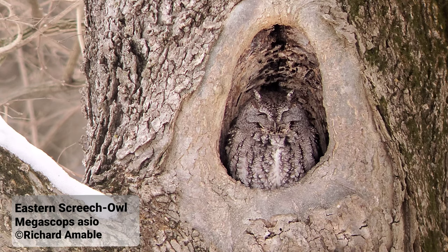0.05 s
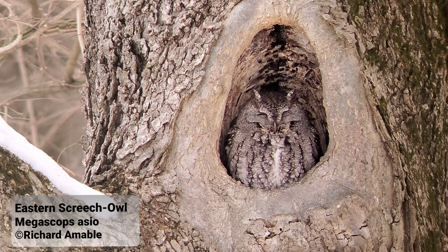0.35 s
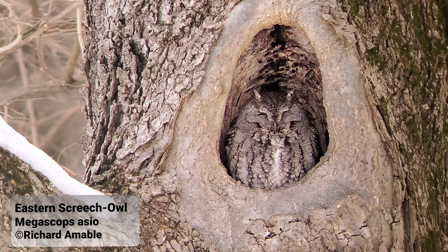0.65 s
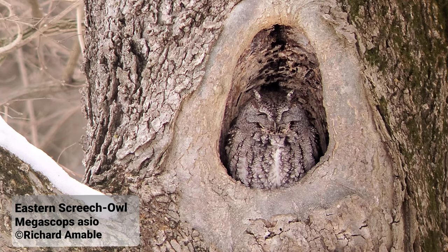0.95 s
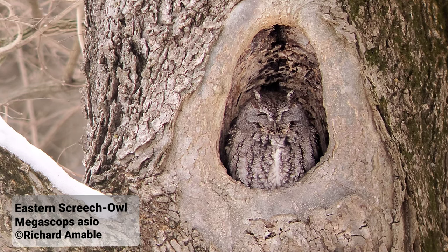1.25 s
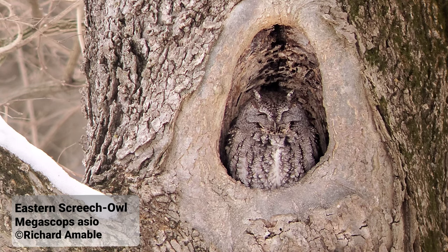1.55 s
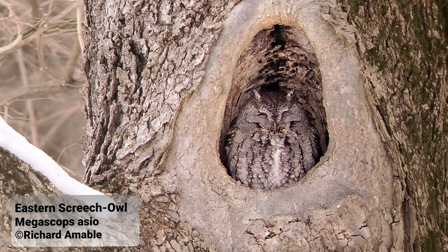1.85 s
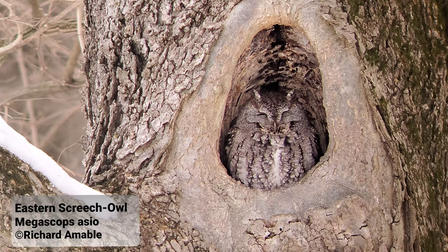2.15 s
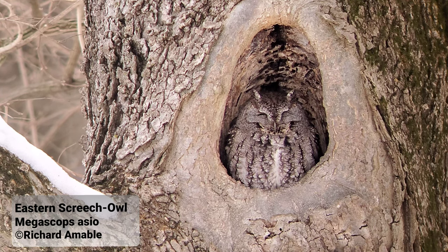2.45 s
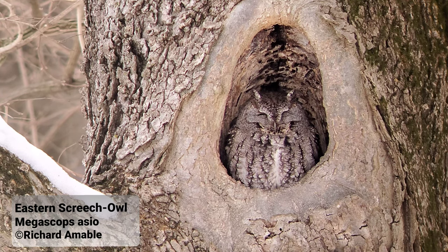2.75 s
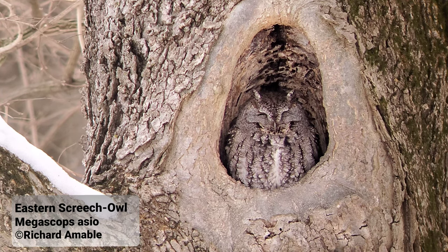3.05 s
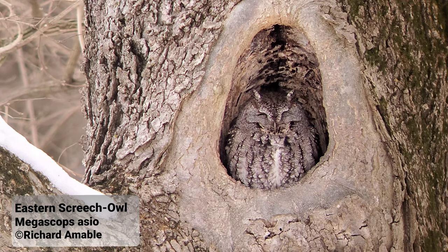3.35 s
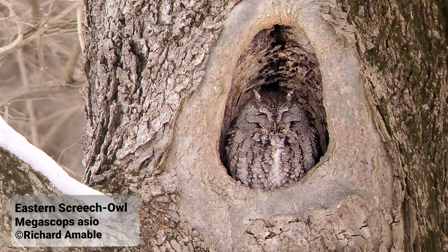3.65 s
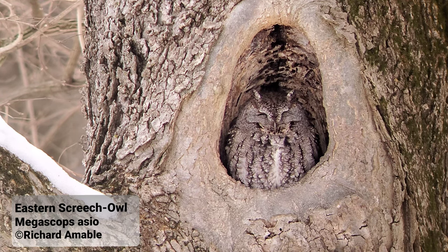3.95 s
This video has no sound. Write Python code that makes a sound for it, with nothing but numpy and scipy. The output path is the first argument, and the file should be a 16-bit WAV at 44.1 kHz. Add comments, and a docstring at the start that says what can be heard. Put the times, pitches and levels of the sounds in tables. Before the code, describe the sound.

A steady low rumble of far traffic hangs among the trees, under faint hiss. Faraway birds whistle and a small bird chips softly, then light gusts thump dully on the microphone with a faint leaf rustle.

```python
"""First comes the low rumble and tyre wash of far traffic in a winter wood, with the echo of a distant
call dying away over faint microphone hiss. Far birds whistle, their notes scattered by the trunks.
A small bird gives two soft chips and, between them, one thin rising chirp; a faint high tick follows
the first chip. Near the end a breeze buffets the microphone, mostly its right port (sound opening),
and dry leaves rustle faintly."""
import sys
import numpy as np
from scipy import signal
from scipy.fft import rfft, irfft
from scipy.io import wavfile
from scipy.ndimage import uniform_filter1d, map_coordinates

SR = 44100
rng = np.random.default_rng(int(sys.argv[2]) if len(sys.argv) > 2 else 0)


def master_out(mix):
    """Clip the mix to full scale and print it as 16-bit PCM to the path in sys.argv[1]."""
    frames = np.transpose(np.atleast_2d(mix))
    ceiling = np.clip(frames, -1, 1)
    pcm = np.round(ceiling * 32767).astype(np.int16)
    wavfile.write(sys.argv[1], SR, pcm)


N = 176400  # 4 seconds
T = np.arange(N) / SR


def amp(db):
    """Turn decibels into a number to multiply a sound by."""
    return 10 ** (np.asarray(db) / 20)


def unit(x):
    """Scale a sound to an average power of 1."""
    return x / np.sqrt(np.mean(x ** 2) + 1e-20)


def along(points, hz):
    """Read between (frequency, value) points, spaced by musical pitch."""
    f, v = np.transpose(points)
    return np.interp(np.log(hz + 1), np.log(f + 1), v)


def curve(rows):
    """Join (time, value) points with straight lines."""
    return np.interp(T, *np.transpose(rows))


def wobble(rate):
    """A smooth random curve through `rate` new values a second."""
    return map_coordinates(rng.standard_normal(4096), [T * rate + 2], mode="mirror")


def pan(db):
    """Left and right gains that make the left side `db` decibels louder."""
    return unit(amp(np.array([[db], [-db]]) / 2))


def rush(spectrum, alike=((1, 0),)):
    """Stereo noise with the given tone colour; the sides match where `alike` is 1, unrelated at 0."""
    hz = np.fft.rfftfreq(N, 1 / SR)
    fade_above = 1 / (1 + (hz / spectrum[-1][0] / 1.2) ** 12)
    fade_below = 1 / (1 + (spectrum[0][0] / 1.2 / (hz + 1)) ** 6)
    colour = fade_above * fade_below * amp(along(spectrum, hz))
    spread = np.arccos(np.clip(along(alike, hz), -1, 1)) / 2
    white = rfft(rng.standard_normal((2, N)))
    mid, side = irfft(white * colour * [np.cos(spread), np.sin(spread)], N)
    return unit(np.array([mid + side, mid - side]))


def steadied(x, span_s):
    """Even out the swells in a noise that are slower than span_s."""
    power = np.mean(np.abs(signal.hilbert(np.atleast_2d(x))) ** 2, axis=0)
    slow_power = uniform_filter1d(power, max(1, int(span_s * SR)))
    return unit(x / np.sqrt(np.abs(slow_power) + 1e-9))


def burst(start, attack, hold, t60):
    """Rise quickly, hold, then fade by 60 dB every t60 seconds."""
    return np.clip((T - start) / attack, 0, 1) * amp(-60 * np.maximum(T - start - hold, 0) / t60)


def woods(x, t60=0.34):
    """Tree trunks scatter a sound into a short, wide echo."""
    t = T[:SR // 2]
    tail = rng.standard_normal((2, len(t))) * amp(-60 * t / t60) * (1 - np.exp(-t / 0.0035))
    return signal.fftconvolve(x[None], tail / np.linalg.norm(tail[0]), axes=1)[:, :N]


# Tone colour of engines and tyres: (frequency [Hz], relative level [dB])
ENGINE_COLOUR = [(12, -56.5), (20, -33), (32, -13.5), (45, -7), (64, 1), (77, -1.5), (100, -6), (135, -12),
                 (180, -18), (260, -18), (400, -25.5), (520, -59)]
TYRE_COLOUR = [(150, -28), (280, -0.5), (360, -2), (470, -3.5), (600, -6.5), (820, -7), (1000, -14.5),
               (1250, -25), (1700, -33), (3000, -40.5)]
# How each swells and sinks: (time [s], relative level [dB])
ENGINE_SWELLS = [(0, -55.5), (.2, -53.5), (.42, -56), (.7, -55), (1.1, -53.5), (1.35, -53), (1.75, -54.5),
                 (2.1, -53), (2.35, -57), (2.48, -52), (2.62, -57), (2.86, -54), (3.1, -52.5), (4, -51.5)]
TYRE_SWELLS = [(0, -67), (.2, -66.5), (.55, -67), (.85, -67.5), (1.4, -70), (1.8, -66.5), (2.2, -68.5),
               (2.6, -70), (3.3, -67.5), (3.85, -65.5), (4, -68)]
# How alike left and right sound: (frequency [Hz], likeness [-1 to 1])
SIDES_ALIKE = [(60, 0.98), (150, 0.96), (370, 0.71), (910, 0.15), (2250, -0.25), (5580, -0.0),
               (13800, -0.0)]

def traffic():
    """Far engines rumble near the middle while the wash of tyres spreads wider."""
    rumble = steadied(rush(ENGINE_COLOUR, SIDES_ALIKE), span_s=.25) * amp(curve(ENGINE_SWELLS) + 2)
    tyres = rush(TYRE_COLOUR, SIDES_ALIKE) * amp(curve(TYRE_SWELLS) + 2.5 + 0.74 * wobble(7))
    return rumble + tyres


# Tone colour of the call's echo: (frequency [Hz], relative level [dB])
ECHO_COLOUR = [(800, -20), (1150, -5), (1370, -0.5), (1550, 1), (1700, -9), (1900, -14), (2300, -26)]

def far_call(t60=1.11):
    """The last echo of a distant call, perhaps a crow's, dies away."""
    return rush(ECHO_COLOUR) * amp(-69.5 - 60 * T / t60) * pan(db=2)


# Tone colour of the hiss and the sizzle: (frequency [Hz], relative level [dB])
HISS_COLOUR = [(500, 3.5), (1500, -2), (2600, -2), (4000, -3.5), (5400, -3), (6100, -11), (7200, -11),
               (9000, -7.5), (12000, -3), (14500, -3)]
SIZZLE_COLOUR = [(3700, -26.5), (4450, 5), (5100, 2.5), (5900, -36)]

def hiss():
    """The microphone hisses steadily, with a flickering sizzle on the left."""
    steady = rush(HISS_COLOUR) * amp(-81.5) * pan(db=1.5)
    sizzle = rush(SIZZLE_COLOUR) * amp(-92 + 1.8 * wobble(9.5)) * pan(db=22.5)
    return steady + sizzle


# Whistles of far birds: (start [s], length [s], pitch [Hz], level [dB])
FAR_WHISTLES = [(.645, .07, 4850, -81), (0.754, .11, 4850, -84), (0.894, 0.062, 5200, -87),
                (2.14, .08, 2520, -87), (2.488, .16, 2560, -88.5), (2.88, 0.098, 2580, -87)]

def far_birds():
    """Wavering notes from so far off that only their scattered echo arrives."""
    notes = np.zeros(N)
    for start, length, hz, db in FAR_WHISTLES:
        swell = np.sin(np.pi * np.clip((T - start) / length, 0, 1))
        pitch = hz * (1 + .03 * wobble(300))
        notes += amp(db) * swell * np.sin(2 * np.pi * np.cumsum(pitch) / SR)
    return woods(notes) * pan(db=6)


# The small bird's two chips: (start [s], relative level [dB])
CHIP_CALLS = [(0.763, -77.5), (2.378, -85)]
# Tone colour of their rasp: (frequency [Hz], relative level [dB])
RASP_COLOUR = [(2000, -24), (2700, -7), (3200, -12), (3650, -5.5), (4150, -4), (5100, -5), (5900, -15),
               (8000, -34)]

def chips():
    """Each chip is a short, rough note and a noisy rasp, blurred by the trees."""
    rasp_level = sum(amp(db) * burst(s, attack=.0033, hold=.038, t60=.44) for s, db in CHIP_CALLS)
    rasp = rasp_level * rush(RASP_COLOUR) * amp(1.3 * wobble(90))
    note_level = sum(amp(db) * burst(s, attack=.0033, hold=.034, t60=.03) for s, db in CHIP_CALLS)
    pitch_hz = 3660 + 107 * wobble(250)
    note = note_level * np.sin(2 * np.pi * np.cumsum(pitch_hz) / SR)
    return (rasp + amp(-1.5) * (note + .6 * woods(note))) * pan(db=7.5)


# Tone colour of the tick: (frequency [Hz], relative level [dB])
HIGH_TICK_COLOUR = [(4000, -25), (5300, 5), (7000, -17), (9000, 1), (12000, -5), (15000, -10)]

def tick():
    """One faint, high, blurred tick."""
    return rush(HIGH_TICK_COLOUR) * amp(-82.5) * burst(start=.905, attack=.008, hold=.036, t60=.31)


def chirp(start_s=1.301, length_s=.024, low_hz=5500, high_hz=8150, rise_s=.0085):
    """The small bird's thin whistle sweeps up, growing louder as its pitch levels off."""
    age = np.clip(T - start_s, 0, length_s)
    progress = age / length_s
    pitch_hz = high_hz + (low_hz - high_hz) * np.exp(-age / rise_s) + 90 * wobble(600)
    swell = amp(-80.5 + 6.4 * progress) * np.abs(np.sin(np.pi * progress)) ** 0.23
    note = swell * np.sin(2 * np.pi * np.cumsum(pitch_hz) / SR)
    return (note + amp(9) * woods(note)) * pan(db=3)


# The breeze, very faint until near the end: (time [s], level [dB])
BREEZE_LEVEL = [(0, -74), (2.85, -74.5), (3.1, -56.5), (3.3, -49), (3.5, -55), (3.65, -66.5), (3.85, -44),
                (4, -58.5)]
# Tone colour of air hitting the microphone: (frequency [Hz], relative level [dB])
WIND_COLOUR = [(20, -24.5), (35, -8), (55, 1), (72, 0), (100, -11.5), (150, -17.5), (210, -34.5),
               (400, -44), (800, -48), (2000, -73)]
# Swirls of air striking the right port: (peak time [s], half length [s], level [dB])
SWIRLS = [(2.98, 0.0099, -41), (3.097, 0.012, -33), (3.252, 0.032, -33), (3.352, 0.021, -36.5),
          (3.434, 0.0079, -26.5), (3.775, 0.013, -33.5), (3.869, 0.02, -29)]

def wind():
    """A breeze flutters on both ports; single swirls give the right one dull thumps."""
    flutter = rush(WIND_COLOUR, alike=[(50, .2)]) * amp(curve(BREEZE_LEVEL) + 1.5 * wobble(12))
    push = sum(amp(db) * np.exp(-((T - peak) / half) ** 2 / 2) for peak, half, db in SWIRLS)
    bass_band = signal.butter(1, [41.3, 106], "bandpass", fs=SR, output="sos")
    churn = steadied(signal.sosfilt(bass_band, rush(WIND_COLOUR)[0]), span_s=0.022)
    muffle = signal.butter(2, 240, fs=SR, output="sos")
    thumps = signal.sosfiltfilt(muffle, push * churn)
    return flutter * pan(db=-1.5) + thumps * np.array([[amp(-23)], [1]])


# Tone colour of dry leaves: (frequency [Hz], relative level [dB])
LEAF_COLOUR = [(2000, 0), (5000, -1.5), (7000, -12), (10000, -8), (13000, -3), (14500, -4)]

def leaves():
    """Dry leaves rustle faintly, louder as the breeze rises."""
    level_db = -58 + 0.55 * curve(BREEZE_LEVEL) + 2.7 * wobble(21)
    return rush(LEAF_COLOUR) * amp(level_db) * pan(db=8)


def scene():
    """Add up all the sounds, left and right."""
    return traffic() + far_call() + hiss() + far_birds() + chips() + tick() + chirp() + wind() + leaves()


def record(dry, low_hz=25.9, top_hz=14500):
    """The camera drops the deepest bass and the highest treble; the sound eases in and out."""
    from_edge_s = np.minimum(T, T[-1] - T)
    ease = np.sin(np.pi / 2 * np.clip(from_edge_s / .003, 0, 1)) ** 2
    bass_cut = signal.butter(2, low_hz, "highpass", fs=SR, output="sos")
    treble_cut = signal.ellip(10, .05, 60, top_hz, fs=SR, output="sos")
    lighter = signal.sosfiltfilt(bass_cut, dry, padlen=SR // 10)
    return signal.sosfiltfilt(treble_cut, lighter * ease)


dry = scene()
out = record(dry)
master_out(out)
```